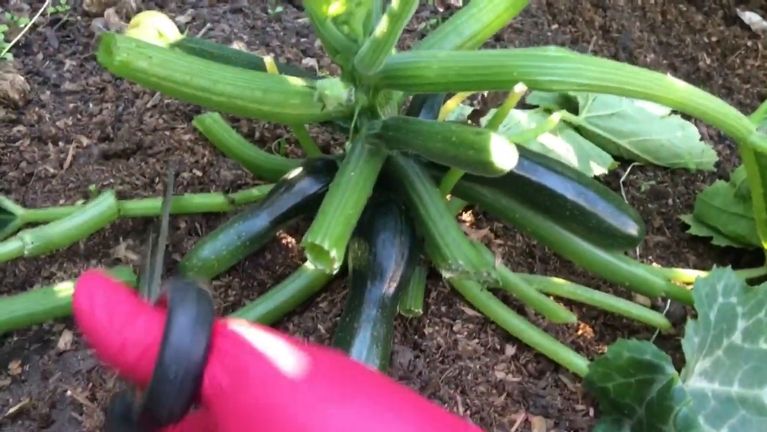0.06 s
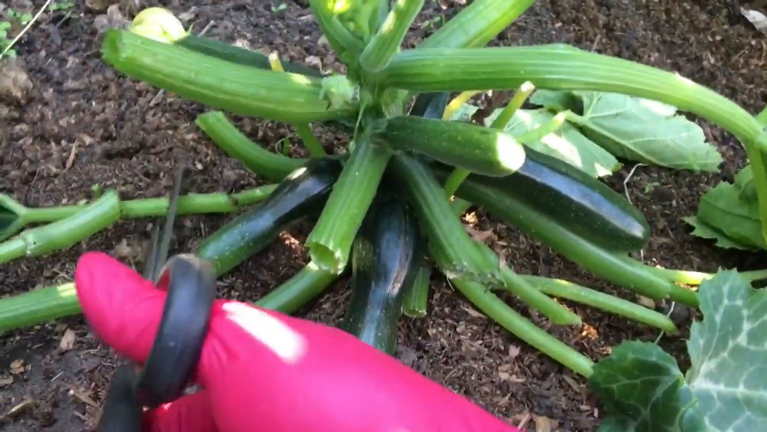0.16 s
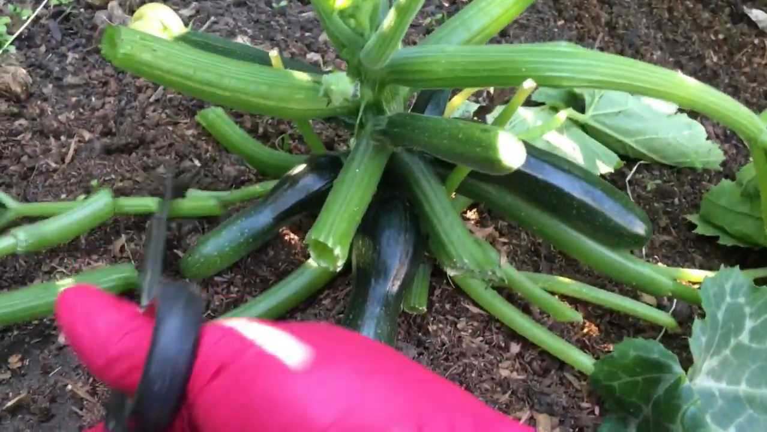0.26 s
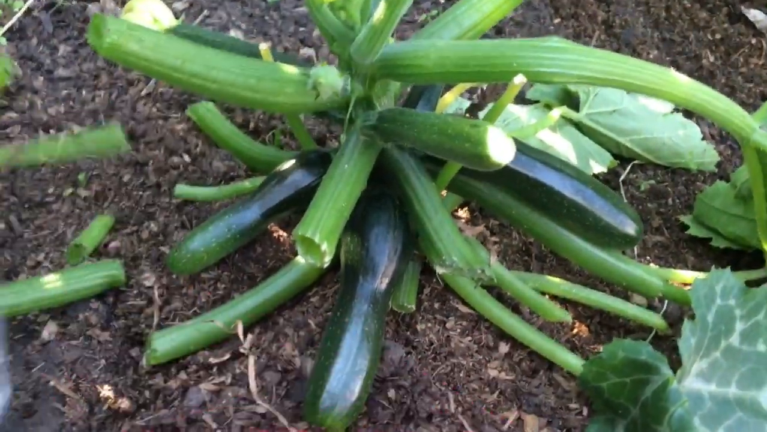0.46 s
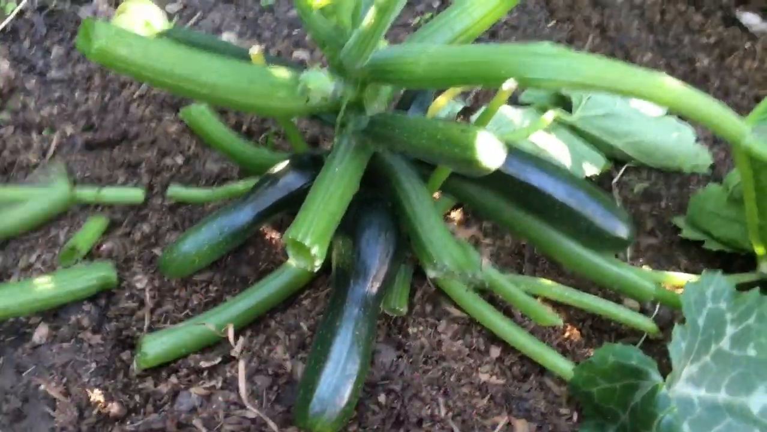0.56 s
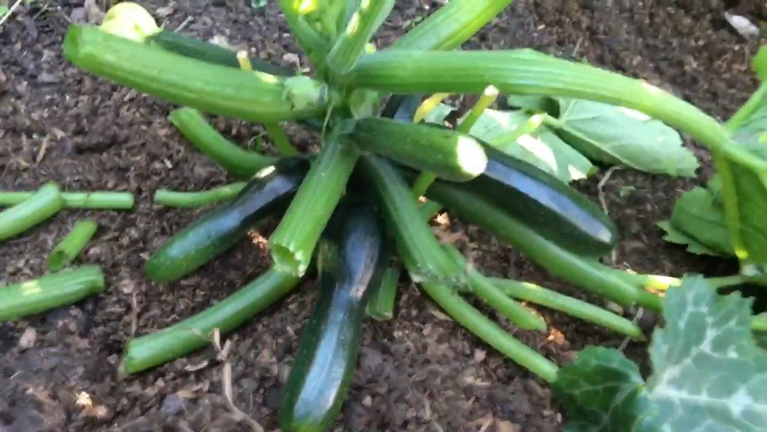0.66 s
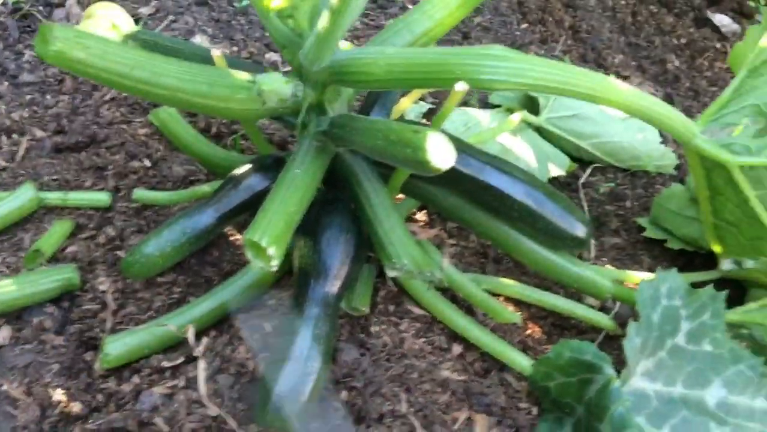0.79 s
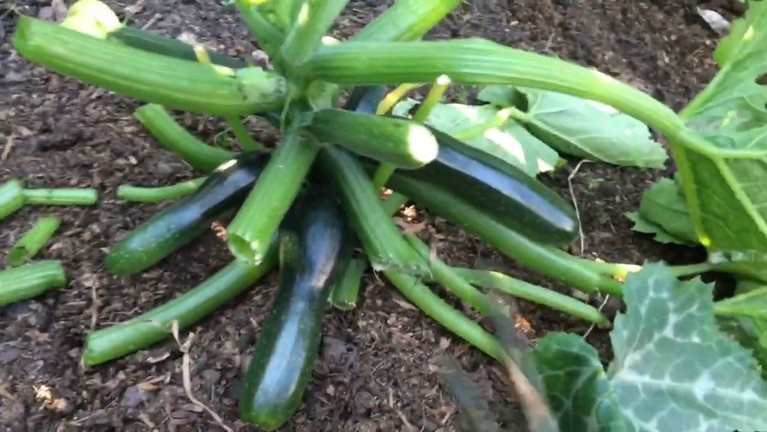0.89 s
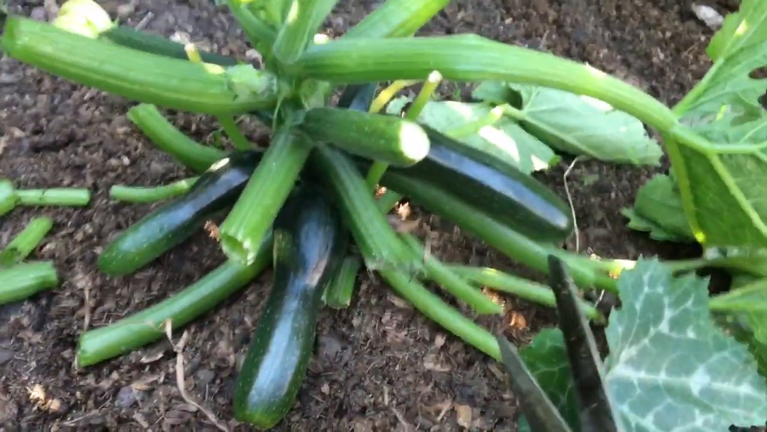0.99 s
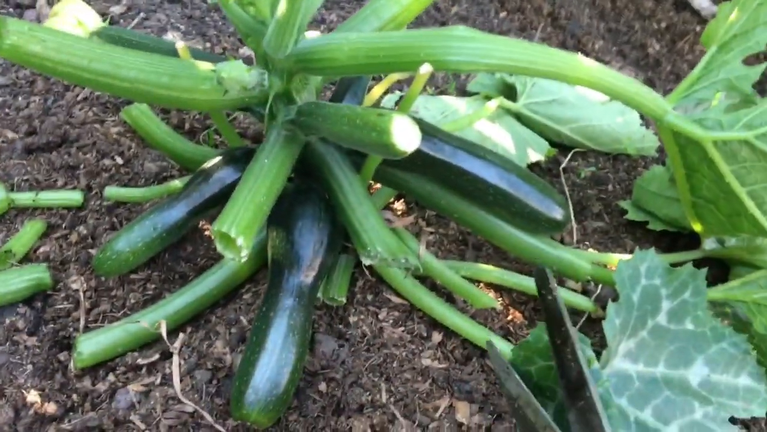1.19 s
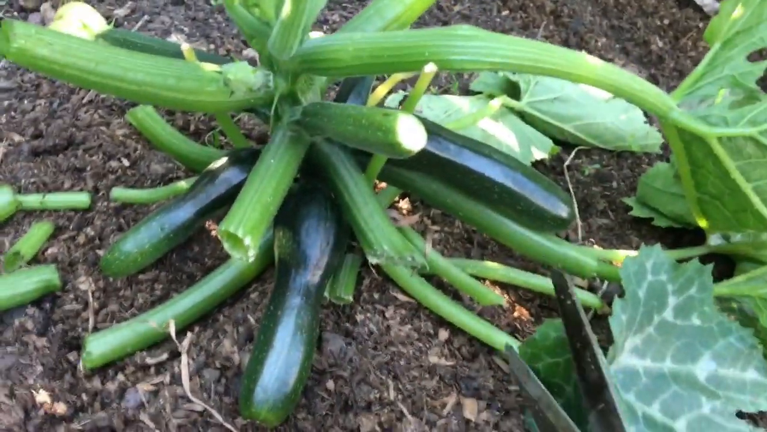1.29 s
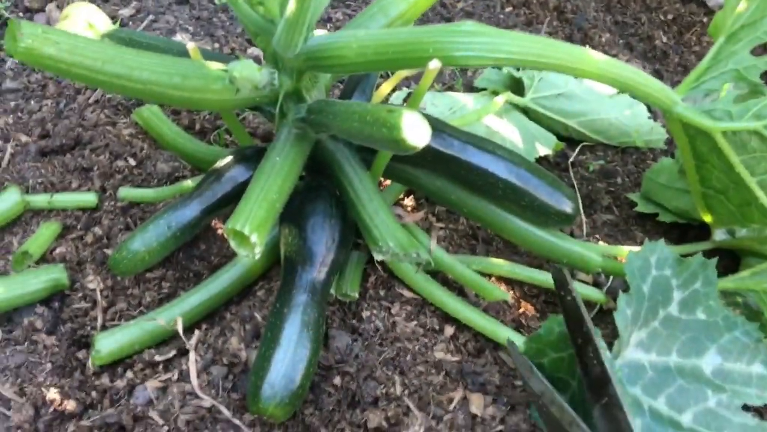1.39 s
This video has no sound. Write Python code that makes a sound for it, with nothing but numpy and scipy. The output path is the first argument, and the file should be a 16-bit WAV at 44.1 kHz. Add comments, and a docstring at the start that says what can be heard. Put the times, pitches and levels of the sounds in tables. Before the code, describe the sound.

Garden shears snip a hollow stalk, close and dry, outdoors. Soft glove and leaf rustle with crisp ticks opens; at 0.19 s blades judder and crunch through fibres, then a tiny tear and loud, bright metallic snap at 0.26 s. Rustles, squeaks and hollow knocks continue until 0.62 s, then it quiets. Small knocks near 1.1 and 1.25 s and ticks near 1.4 s follow. A faint distant machine hums low throughout.

```python
"""Garden shears cutting a stalk

Garden shears close on a hollow stalk close by. The blades judder and ring over a crunch of fibre noise,
the stalk tears with a falling, gritty tone, and the blades snap shut in a few ringing blows and a rattle.
Glove and leaves rustle in tiny grains of noise, with noisy squeaks, bright ticks and hollow knocks.
A machine far off hums in wavering tones over a low rumble of filtered noise.
"""
import sys
import numpy as np
from scipy import signal
from scipy.fft import rfft, irfft
from scipy.io import wavfile
from scipy.ndimage import uniform_filter1d

SR = 44100
rng = np.random.default_rng(int(sys.argv[2]) if len(sys.argv) > 2 else 0)


def digitize_waveform(pressure):
    """Quantize a signal to 16-bit integers and store it at the path in sys.argv[1].

    Rows of a 2-D input are taken as channels; values are limited to [-1, 1].
    """
    field = np.atleast_2d(pressure).T
    bounded = np.clip(field, -1, 1)
    quanta = np.round(bounded * 32767).astype(np.int16)
    wavfile.write(sys.argv[1], SR, quanta)


N = 63945  # length in samples

# Tone of the low rumble and air: pitch_hz, density_db (relative power per Hz)
AIR_COLOUR = [(25, -9), (60, -5), (91, -12.5), (150, -5.5), (205, -5.5), (291, -5), (400, -14.5),
              (500, -23), (637, -16.5), (749, -25), (1000, -25.5), (1680, -27.5), (2390, -34.5),
              (4500, -43), (9000, -46), (10500, -56.5), (12500, -52.5), (15800, -51.5)]
AIR_DB = -47.5

# Tones of the far machine: pitch_hz, level_db, width_hz (wider tones waver more)
HUM_TONES = [(209, -53.5, 3.9), (294.5, -45.5, 0.83), (343.3, -57.5, 6), (415.5, -63.5, 3),
             (647.6, -67.5, 8.05), (835.5, -70.5, 1.7), (1705, -75, 9.95)]
HUM_WAVER_DB = 0.93  # level waver for a tone 1 Hz wide

# Rustle of glove and leaves over time: start_s, level_db, extra_treble_db
RUSTLE_LEVELS = [(0, -55.5, 5.5), (.03, -55, 1), (.06, -65, 4.5), (0.118, -66, 1), (.18, -58.5, 6),
                 (.3, -60.5, 8), (.33, -61.5, 1), (.35, -57, 8.5), (.41, -56.5, 2), (.455, -56, 9),
                 (.52, -56.5, 3.5), (.56, -52.5, 2.5), (.61, -59.5, 4), (.8, -64, 1.5), (.84, -71.5, 6.5),
                 (.96, -77.5, 5.5), (1.021, -66.5, -2), (1.2, -77.5, -5), (1.34, -69, -2),
                 (1.45, -64.5, 2.5)]
# Tone of the rustle: pitch_hz, density_db (relative power per Hz)
RUSTLE_COLOUR = [(530, -49), (900, -18.5), (1780, 3.5), (2650, -5.5), (4540, -6.5), (4940, -9.5),
                 (10300, -14.5), (12000, -14.5), (15800, -22.5)]
# In each band: how many grains, their average extra level, and their time to fade 60 dB
GRAINS_PER_S, GRAIN_SPREAD_DB, GRAIN_T60_S = 990, 2, 0.0149
# Brief squeaks of glove on stem: start_s, length_s, pitch_hz, width_share (of the pitch), level_db
SQUEAKS = [(0.289, 0.053, 6600, 0.12, -59.5), (0.346, .012, 4600, .15, -59),
           (0.372, 0.037, 4320, 0.17, -57), (0.444, .025, 14600, .12, -58),
           (0.772, 0.043, 12000, 0.63, -71.5), (1.274, 0.024, 12560, 0.27, -71.5),
           (1.074, 0.062, 830, 0.65, -54)]

# Ticks of stems and leaves: start_s, peak_db, centre_hz, width_share (of the centre), t60_s
TICKS = [(0.0147, -40, 6000, 1.9, 0.012), (.135, -40, 7440, 2.34, 0.0098), (.150, -43, 4770, 1.4, 0.02),
         (0.1618, -40, 8800, 1.1, 0.014), (0.179, -42, 7000, 1.4, .018), (0.333, -43, 6600, .8, .015),
         (0.342, -41.5, 5000, 1.9, 0.019), (0.3674, -38.5, 11000, .9, .017),
         (0.3668, -46, 3200, 0.28, 0.018), (.4338, -34, 12500, 0.16, 0.013), (.4340, -33, 9100, 1.7, .012),
         (0.4753, -40.5, 6150, .8, .02), (0.484, -41.5, 3250, 1.8, 0.013), (0.5005, -40.5, 8000, 2.6, .012),
         (0.5422, -44, 4460, 1.3, 0.02), (.5624, -43, 4000, 2.1, 0.021), (.7194, -58, 6000, 0.65, .012),
         (1.1491, -58, 10000, 1.3, .02), (1.2475, -45.5, 7500, 2.2, 0.017), (1.3883, -43, 3980, 1.4, 0.011),
         (1.3956, -48.5, 3900, .6, .02), (1.41, -47.5, 3600, 0.29, 0.011)]
# Hollow knocks of stalks: start_s, level_db, pitch_hz, t60_s
KNOCKS = [(.3672, -39.5, 1820, .022), (.445, -40, 2140, 0.021), (.482, -47, 1970, 0.022),
          (.543, -50, 2384, 0.044), (0.622, -41.5, 1480, 0.014), (1.075, -48, 800, .015),
          (1.099, -40, 840, 0.019), (1.248, -44.5, 2220, 0.021)]
KNOCK_RISE_S = 0.00035

# Judders of the blades in the stalk: start_s, level_db, extra_low_modes_db
JUDDERS = [(0.1919, -41, -20.5), (0.197, -34.5, -10.5), (0.2026, -34.5, -13), (.2038, -39.5, -9.5),
           (0.207, -33, -11), (.2120, -25, -10), (0.2142, -32, -1), (0.2175, -25.5, -7.5),
           (0.218, -31.5, -2.5), (.2220, -34.5, 3), (0.226, -37, 7), (.2350, -35, 7), (0.236, -37, 4),
           (0.241, -36, -2.5), (0.2427, -35, 6), (0.2533, -35, 2.5), (0.2574, -30.5, 9)]
# Ringing modes of the juddering blades: pitch_hz, level_db, t60_s
BLADE_MODES = [(1103, -16, 0.0067), (2213, -16.5, 0.0071), (2990, -9, 0.017), (4040, -11, 0.0072),
               (5870, -3, 0.014), (6290, 1, 0.0098), (6700, -7.5, 0.0098), (8500, -8.5, .010),
               (9430, -13.5, .010), (14500, -23.5, 0.0091)]
JUDDER_RISE_S, LOW_MODES_BELOW_HZ = 0.00042, 5000
PITCH_DRIFT = 0.026  # typical random shift of each mode, as a share of its pitch
# Crunch of fibres over time: time_s, level_db
CRUNCH_LEVELS = [(.185, -73), (.198, -63), (.210, -62), (.213, -43.5), (.224, -38.5), (.231, -51),
                 (.236, -50.5), (.250, -53), (.259, -40.5), (.263, -31), (.265, -67.5)]
# Tone of the crunch: pitch_hz, density_db (relative power per Hz)
CRUNCH_COLOUR = [(700, -17), (1100, -5), (2200, -2.5), (4200, -1.5), (6200, -3), (9000, -3), (11500, -11.5),
                 (15000, -8.5), (15800, -7)]

# Tear before the snap: a gliding tone, plus noise at TEAR_GRIT times unit level
TEAR_S, TEAR_LEN_S, TEAR_FROM_HZ, TEAR_TO_HZ = 0.2603, 0.0033, 7300, 2800
TEAR_DB, TEAR_GRIT = -24, 0.55
# Blows of the snap: start_s, level_db
SNAP_BLOWS = [(.26372, 0), (.26455, -16), (.2657, -15), (.2677, -25), (.2712, -29)]
# Ringing modes of the blades as they shut: pitch_hz, level_db, t60_s
SHUT_MODES = [(660, -29, .028), (1370, -26, .024), (2120, -12, .009), (3650, -22, .014), (4240, -15, .014),
              (5750, -1, .0040), (8500, -9, .004), (11000, -12, .004), (12500, -5, .003), (13500, -8, .003),
              (15000, -5, .0025)]
SNAP_RISE_S, SNAP_LOW_CUT_HZ = 0.00006, 600
# Tone of the rattle and tail: pitch_hz, density_db (relative power per Hz)
RATTLE_COLOUR = [(450, -28), (1050, -33), (2200, -1.5), (2800, -11.5), (4000, -2), (6000, 1.5), (9000, 1.5),
                 (15800, -9.5)]
RATTLE_DB, RATTLE_T60_S, TAIL_DB, TAIL_T60_S = -21.5, 0.023, -35, 0.09

LOW_CUT_HZ, TOP_STOP_HZ = 33, 17400  # from the stop edge up, the sound is at least 70 dB down


def undb(db):
    """Turn decibels into a plain multiplier."""
    return 10 ** (np.asarray(db) / 20)


def unit(x):
    """Scale a sound to an average (RMS) level of 1."""
    return x / np.sqrt(np.mean(x ** 2))


def noise():
    """Plain white noise, as long as the scene."""
    return rng.standard_normal(N)


def coloured(x, table):
    """Shape the tone of a sound by (Hz, dB) points, joined evenly on a log pitch scale."""
    hz, db = np.array(table, float).T
    f = np.fft.rfftfreq(len(x), 1 / SR)
    gain_db = np.interp(np.log(f + 1), np.log(hz), db, left=-60, right=-110)
    return irfft(rfft(x) * undb(gain_db), len(x))


def highpass(x, order, hz):
    """Cut what lies below hz."""
    return signal.sosfilt(signal.butter(order, hz, "highpass", fs=SR, output="sos"), x)


def band(x, hz, share):
    """Keep a band around hz; a larger share makes it wider."""
    r = 1 + np.clip(share, 0.05, 3) / 2
    edges = [hz / r, min(hz * r, 0.45 * SR)]
    return signal.sosfilt(signal.butter(2, edges, "bandpass", fs=SR, output="sos"), x)


def walk(rate):
    """Smooth random wander, about rate new steps a second, with a spread of about 1."""
    k = int(SR / rate)
    steps = np.repeat(rng.standard_normal(N // k + 1), k)
    smooth = uniform_filter1d(uniform_filter1d(steps, k), k)
    return unit(smooth)[:N]


def rise(t, s):
    """Soft start at t = 0: climbs towards 1, most of the way within about 2 s, s in seconds."""
    return 1 - np.exp(-np.clip(t, 0, None) / max(s, 1e-5))


def fade(t, t60):
    """Start at t = 0 and fall 60 dB in t60 seconds."""
    return (t >= 0) * np.exp(-np.log(1000) * np.clip(t, 0, None) / max(t60, 1e-3))


def ring(t, modes):
    """A struck object: each mode is a sine that starts at t = 0 and dies away."""
    return sum(undb(db) * np.sin(2 * np.pi * hz * t) * fade(t, t60) for hz, db, t60 in modes)


def air():
    """Steady low rumble: noise with most of its strength in the bass."""
    return undb(AIR_DB) * unit(coloured(noise(), AIR_COLOUR))


def hum():
    """Far machine: tones whose pitch and level waver the more, the wider they are."""
    out = 0
    for hz, db, width in HUM_TONES:
        pitch = hz + width / 2 * walk(12.02)
        phase = 2 * np.pi * (np.cumsum(pitch) / SR + rng.random())
        level_db = db + HUM_WAVER_DB * np.sqrt(abs(width)) * walk(11)
        out = out + np.sqrt(2) * undb(level_db) * np.sin(phase)
    return out


def rustle_grains(t):
    """Rubbing leaves: dense tiny noise grains at random moments, separate in each of eight bands."""
    out = 0
    for hz in 1200 * 1.45 ** np.arange(8):
        chance = rng.random((N, 2))
        starts = chance[:, 0] < GRAINS_PER_S / SR
        hits = starts * undb(-GRAIN_SPREAD_DB * np.log(chance[:, 1] + 1e-6))
        grains = signal.fftconvolve(hits, fade(t[:2000], GRAIN_T60_S))[:N]
        out = out + undb(1.1 * walk(20)) * band(grains * noise(), hz, 0.54)
    return unit(coloured(out, RUSTLE_COLOUR))


def rustle(t):
    """Glove and leaves: grains whose level and brightness change with the movement."""
    s, db, treble_db = np.array(RUSTLE_LEVELS).T
    grains = rustle_grains(t)
    extra_treble = (undb(np.interp(t, s, treble_db)) - 1) * highpass(grains, 2, 7000)
    return undb(np.interp(t, s, db)) * (grains + extra_treble)


def squeaks(t):
    """Glove rubbing on a stem: bands of noise that swell and sink."""
    out = 0
    for start, length, hz, share, db in SQUEAKS:
        swell = np.sin(np.pi * np.clip((t - start) / length, 0, 1))
        out = out + undb(db) * swell * unit(band(noise(), hz, share))
    return out


def ticks(t):
    """Stems and leaves: short noise bursts that start at once and die away."""
    out = 0
    for s, db, hz, share, t60 in TICKS:
        burst = fade(t - s, t60) * band(noise(), hz, share)
        out = out + undb(db) * burst / np.abs(burst).max()
    return out


def knocks(t):
    """Hollow stalks: each knock rings one short tone."""
    out = 0
    for s, db, hz, t60 in KNOCKS:
        out = out + ring(t - s, [(hz, db, t60)]) * rise(t - s, KNOCK_RISE_S)
    return out


def judders(t):
    """Blades slipping through the fibres: each slip rings them at slightly shifted pitches."""
    out = 0
    drifts = rng.standard_normal((len(JUDDERS), len(BLADE_MODES)))
    for (s, db, low_db), drift in zip(JUDDERS, drifts):
        modes = []
        for (hz, mode_db, t60), d in zip(BLADE_MODES, drift):
            extra_db = low_db * (hz < LOW_MODES_BELOW_HZ)
            modes.append((hz * (1 + PITCH_DRIFT * d), mode_db + extra_db, t60))
        out = out + undb(db) * ring(t - s, modes) * rise(t - s, JUDDER_RISE_S)
    return out


def crunch(t):
    """Crushed fibres: noise made gritty by fast random jumps in level."""
    jumps = undb(3 * rng.exponential(size=N // 20 + 1))
    grit = uniform_filter1d(jumps.repeat(20), 20)[:N]
    level_db = np.interp(t, *np.array(CRUNCH_LEVELS).T, left=-120, right=-120)
    return undb(level_db) * unit(coloured(grit * noise(), CRUNCH_COLOUR))


def tear(t):
    """Tearing stalk: a falling tone with noise that swells and sinks in a few milliseconds."""
    u = np.clip((t - TEAR_S) / TEAR_LEN_S, 0, 1)  # progress from 0 to 1
    hz = TEAR_FROM_HZ * (TEAR_TO_HZ / TEAR_FROM_HZ) ** u
    tone = np.sin(2 * np.pi * np.cumsum(hz) / SR)
    grit = TEAR_GRIT * unit(band(noise(), 3700.0, 2.9))
    swell = np.sqrt(np.sin(np.pi * u) + 1e-9) * (u > 0) * (u < 1)
    return undb(TEAR_DB) * swell * (tone + grit)


def snap(t):
    """Blades meet and bounce: each blow rings the metal, over a noisy rattle with a longer tail."""
    blows = sum(undb(db) * ring(t - s, SHUT_MODES) * rise(t - s, SNAP_RISE_S) for s, db in SNAP_BLOWS)
    since_snap = t - SNAP_BLOWS[0][0]
    rattle_level = undb(RATTLE_DB) * fade(since_snap, RATTLE_T60_S)
    tail_level = undb(TAIL_DB) * fade(since_snap, TAIL_T60_S)
    after = (rattle_level + tail_level) * unit(coloured(noise(), RATTLE_COLOUR))
    return highpass(blows, 2, SNAP_LOW_CUT_HZ) + after


def scene():
    """Add all the sounds together into one channel."""
    t = np.arange(N) / SR
    background = air() + hum()
    plants = rustle(t) + squeaks(t) + ticks(t) + knocks(t)
    shears = judders(t) + crunch(t) + tear(t) + snap(t)
    return (background + plants + shears)[None]


def record(dry):
    """Cut the deep bass and the very top of the sound."""
    dry = highpass(dry, 4, LOW_CUT_HZ)
    return signal.sosfilt(signal.cheby2(10, 70, TOP_STOP_HZ, fs=SR, output="sos"), dry)


dry = scene()
out = record(dry)
digitize_waveform(out)
```